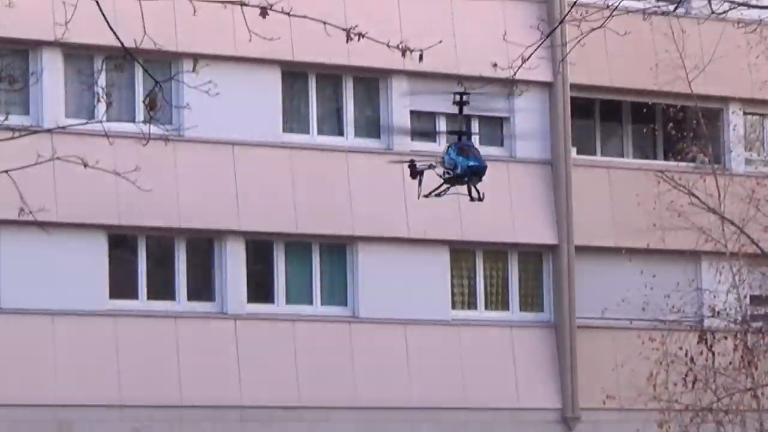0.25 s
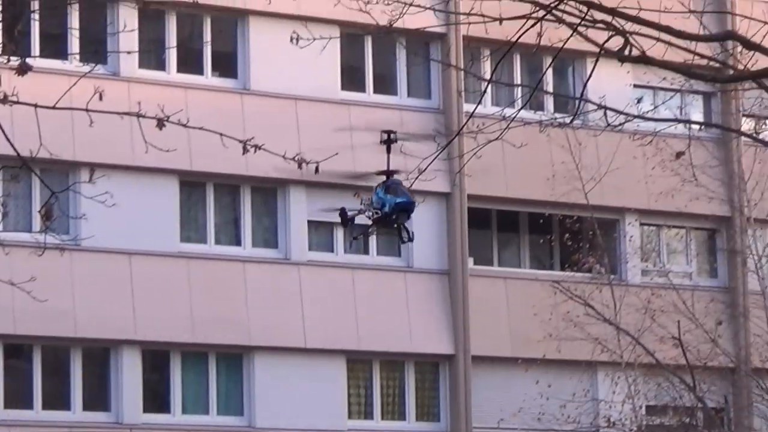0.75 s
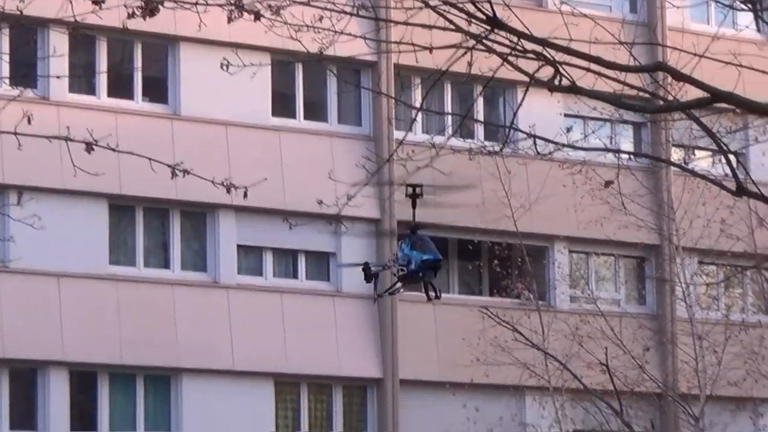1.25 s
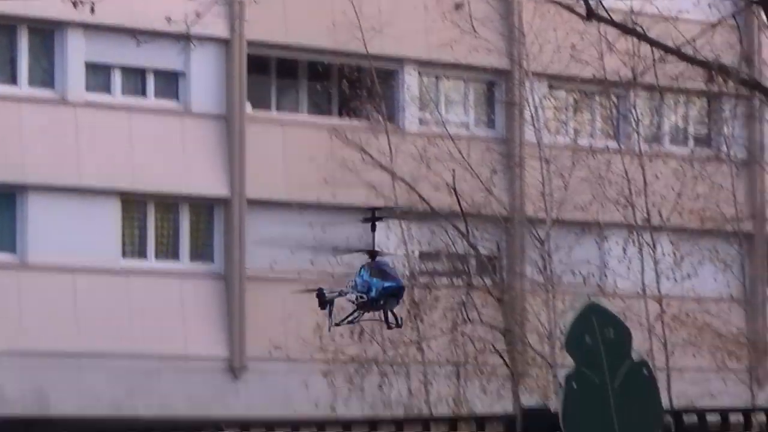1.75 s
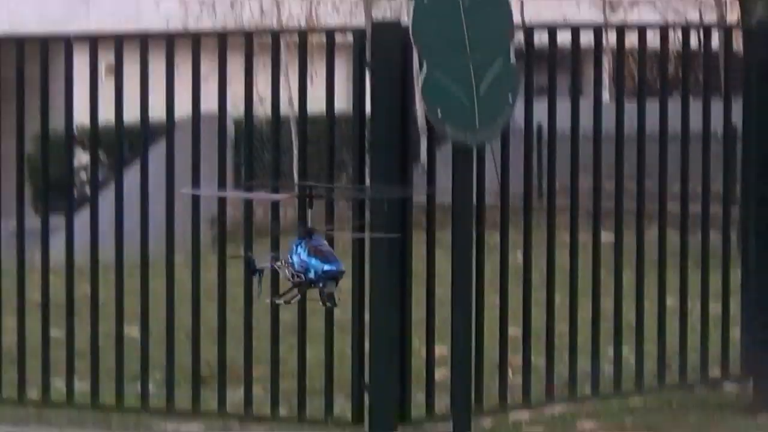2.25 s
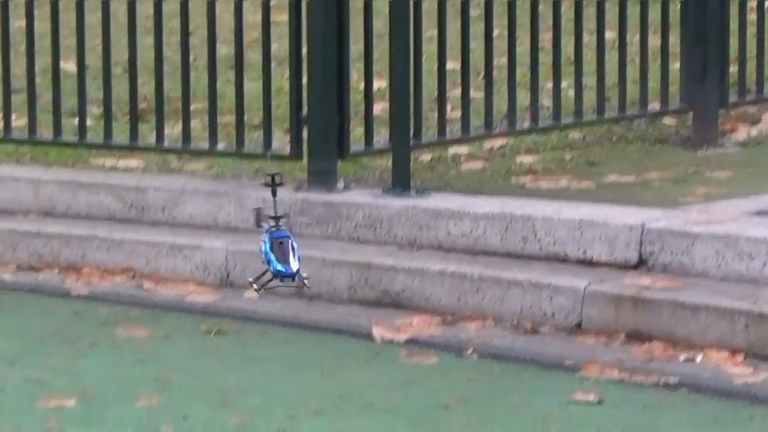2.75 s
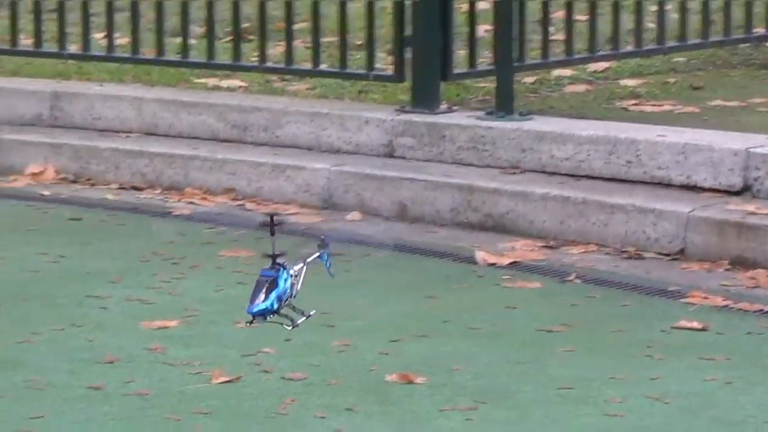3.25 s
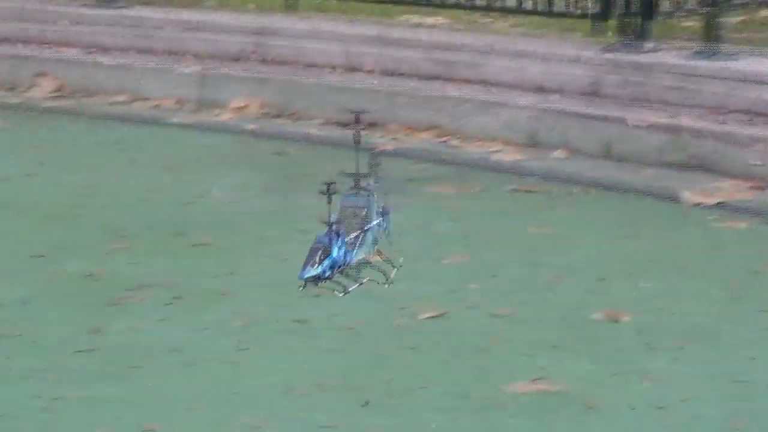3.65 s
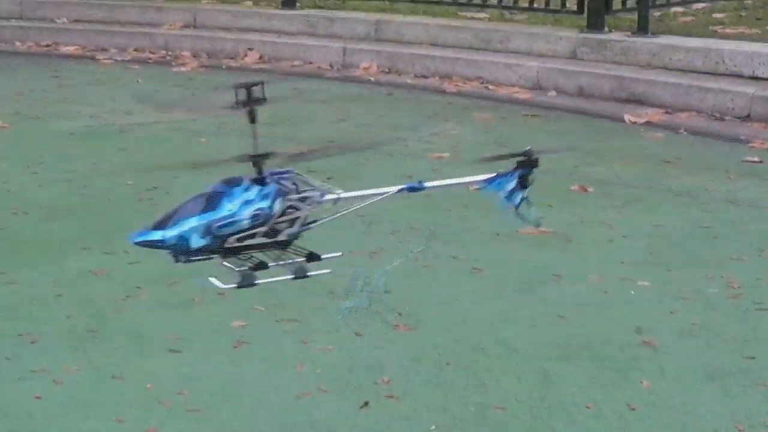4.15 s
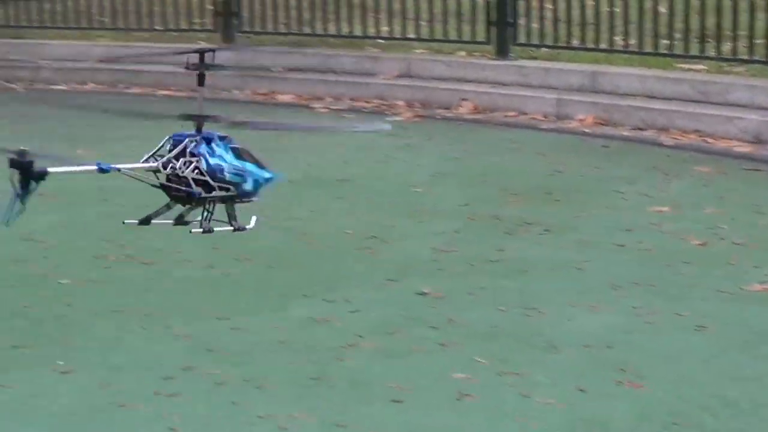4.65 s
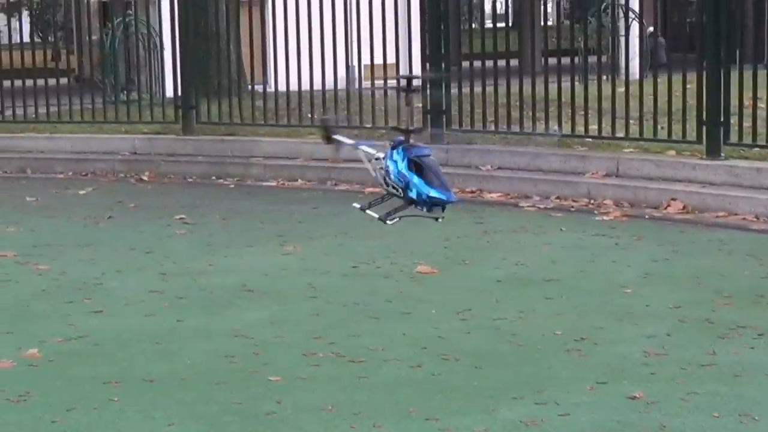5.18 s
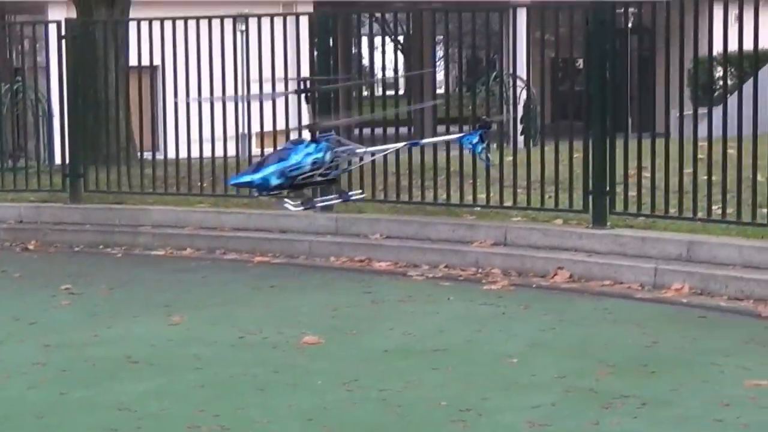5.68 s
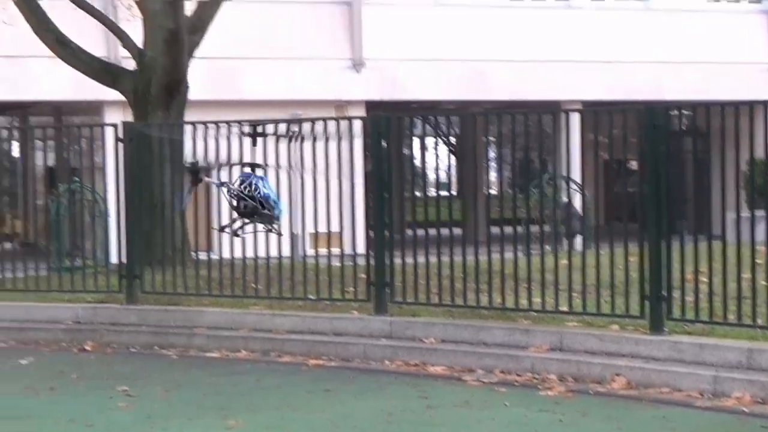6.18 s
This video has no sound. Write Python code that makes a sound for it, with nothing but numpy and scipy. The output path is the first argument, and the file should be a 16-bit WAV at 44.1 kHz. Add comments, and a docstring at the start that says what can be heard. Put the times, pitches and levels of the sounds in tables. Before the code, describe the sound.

A small electric helicopter flies outdoors several metres away, its plastic gears whining and rattling with a fast throb. The pitch sags, then climbs as it comes nearer. The whole sound sinks away, then cuts abruptly to the craft close by, brighter and louder, its whine and rattle sweeping past as it spins. Soft dull echoes, distant traffic and a faint machine hum lie behind, in wide stereo with slightly muffled top treble.

```python
"""Toy helicopter over a playground

A small electric helicopter flies between a fence and a block of flats. Its gear teeth scrape and knock,
so its parts rattle as ringing noise; the tooth rate whines as sines, and all throb with each rotor turn.
The whole sound sinks away, then the craft is suddenly close, spinning on the spot and sweeping its
rattle and whine past the listener like a beam. Dull echoes follow it.
Behind it a town murmurs in shaped noise, a distant machine hums in wavering sines and a faint tone passes."""
import sys
import numpy as np
from scipy import signal
from scipy.fft import rfft, irfft, next_fast_len
from scipy.io import wavfile

SR = 44100
rng = np.random.default_rng(int(sys.argv[2]) if len(sys.argv) > 2 else 0)


def file_out(sig):
    """Save sig as 16-bit WAV at sys.argv[1]."""
    # one column per channel
    cols = np.atleast_2d(sig).T
    # limit, then scale
    lim = np.clip(cols, -1, 1)
    pcm = np.round(lim * 32767).astype(np.int16)
    wavfile.write(sys.argv[1], SR, pcm)


N = 283122   # length in samples
TIME = np.arange(N) / SR   # seconds
CLOSE_S = 4.249   # the craft is suddenly close from this second
FADE_FROM_S, FADE_END_DB = 3.285, -14   # the sinking starts here; the town ends this low
CRAFT_SINKS = 1.1   # the craft sinks this many times as far as the town, in dB
CUTOFF_HZ = 10450   # nearly nothing is heard above this

# Colour of the far traffic. Each row: frequency in Hz, relative level in dB per Hz.
RUMBLE_COLOUR = [(20, -55), (30, -25), (40, -13), (62, -25.5), (110, -3), (170, -1), (270, 2.5), (340, -3),
                 (500, -15.5)]
# Colour of the town's murmur. Each row: frequency in Hz, relative level in dB per Hz.
MURMUR_COLOUR = [(200, -25), (310, -9), (400, -2.5), (720, -1.5), (880, -4), (1200, -5.5), (1700, -7.5),
                 (3000, -19), (9000, -24)]
# Swell of the town's murmur. Each row: time in seconds, level in dB.
MURMUR_SWELL = [(0.0, -38), (0.9, -39.5), (1.2, -36.5), (1.7, -38.5), (2.3, -39.5), (2.8, -38),
                (3.5, -40.2), (3.9, -36.5), (4.04, -29.5), (4.3, -39), (5.3, -39.5), (6.1, -38.5),
                (6.42, -40)]
# A deep rumble that comes and goes. Each row: time in seconds, level in dB.
DEEP_SWELL = [(0.0, -48.5), (0.3, -62), (1.0, -52), (1.5, -61.5), (3.4, -64.0), (4.4, -63.0), (6.42, -63)]
# Colour of the deep rumble. Each row: frequency in Hz, relative level in dB per Hz.
DEEP_RUMBLE_COLOUR = [(20, -35), (30, -16), (42, -5), (75, 12), (120, -21), (300, -49)]
# How alike left and right are. Each row: frequency in Hz, likeness (1 = the same on both sides).
STEREO_LIKENESS = [(40, 0.99), (130, 0.81), (300, 0.79), (650, 0.67), (1500, 0.36), (9000, 0.45)]
# Tones of the distant machine. Each row: frequency in Hz, level in dB over HUM_DB.
HUM_TONES = [(81.4, -30.5), (108.6, -17.5), (123, -18), (163, -11), (190.3, -17), (217.3, -11),
             (243.6, -10.5), (271.6, -9.5)]
# Its clearest tones, a low pair and a high pair. Each entry: frequency in Hz, dB over the pair's swell.
DRONE_PAIRS = [
    [(368, -2.5), (490, -5.5)],
    [(746, -2), (719.4, -6.5)],
]
# Swell of the low pair. Each row: time in seconds, level in dB.
DRONE_LOW_SWELL = [(0, -62), (1.3, -48), (2, -55), (3.2, -47), (4.5, -59), (6.42, -58.5)]
# Swell of the high pair. Each row: time in seconds, level in dB.
DRONE_HIGH_SWELL = [(0, -48), (2.4, -43.5), (3.1, -60), (4.3, -49.5), (6.42, -49)]
# A faint far tone that comes and fades. Each row: time in seconds, frequency in Hz, level in dB.
PASSING_TONE = [(5.85, 780, -70.5), (5.97, 795, -47), (6.06, 812, -47.5), (6.15, 830, -40.5),
                (6.2, 832, -57), (6.28, 826, -45), (6.38, 815, -69.5)]
RUMBLE_DB, HUM_DB = -41.5, -43.5

# Gear speed under the throttle, far off. Each row: time in seconds, tooth contacts per second.
GEAR_SPEED_FAR = [(0.0, 1950.0), (0.3, 1914.0), (0.6, 1868.0), (1.35, 1763.0), (1.78, 1767.0),
                  (2.14, 1901.0), (2.5, 1963.0), (2.73, 2033.0), (3.03, 2013.0), (3.24, 1918.0),
                  (3.45, 1929.0), (4.24, 1930.0)]
# Gear speed close by. Each row: time in seconds, tooth contacts per second.
GEAR_SPEED_NEAR = [(4.25, 2026.0), (4.45, 2010.0), (5.1, 1986.0), (5.7, 1983.0), (6.12, 2037.0),
                   (6.42, 2037.0)]
# Distance of the craft, far off. Each row: time in seconds, distance in metres.
METRES_FAR = [(0.0, 7.9), (1.3, 7.56), (2.3, 6.34), (3.2, 5.17)]
# Distance of the craft, close by. Each row: time in seconds, distance in metres.
METRES_NEAR = [(4.25, 2.24), (4.45, 1.95), (5.05, 2.62), (5.45, 3), (5.9, 2.65), (6.42, 3.36)]
# Far off the nose swings slowly past the listener.
# Each row: time in seconds, heading in degrees (0 = nose on, 90 = left side on).
NOSE_SWING = [(0.0, -33.5), (0.45, -31.5), (0.85, -27), (1.7, -34), (2.25, -32.5), (2.7, -24), (3.0, 0.5),
              (3.25, 21.0), (3.6, 8.0), (4.24, 24.5)]
# Delay of the ground bounce, changing with height. Each row: time in seconds, delay in seconds.
BOUNCE_DELAY = [(0, .0042), (1.2, .0045), (2.5, .004), (3.3, .0042), (4.6, .004), (5.5, .0043),
                (6.42, .0045)]
REFERENCE_M = 1.753   # distance adds 0 dB here
SPIN_DEG_PER_S, NOSE_ON_S = 226, 5.47   # steady spin close by, and when the nose points at the listener
TEETH, PINION_TEETH = 75, 8   # main wheel and small driving gear

# Load swing of the off-centre main wheel. Each row: times per rotor turn, depth in dB.
LOAD_THROB = [(1, 1.45), (2, -0.3), (3, 0.3), (4, 1.1), (5, 1.1), (6, 0.8), (7, 1.2)]
# Ringing of the canopy. Each row: frequency in Hz, width in Hz, relative level in dB.
CANOPY_MODES = [(1605, 800, -3.5), (1883, 400, -9), (2385, 370, -2), (2698, 160, -4.5), (3150, 4700, -8.5),
                (3750, 1400, -4.5), (4385, 1540, -8.5)]
# Ringing of the frame. Each row: frequency in Hz, width in Hz, relative level in dB.
FRAME_MODES = [(4782, 410, 1), (5084, 680, -1.5)]
# Ringing of the gear wheel. Each row: frequency in Hz, width in Hz, relative level in dB.
WHEEL_MODES = [(5770, 1300, 1), (6646, 980, 6), (7134, 690, 1.5)]
# Ringing of the tooth sizzle. Each row: frequency in Hz, width in Hz, relative level in dB.
SIZZLE_MODES = [(8260, 920, -1.6), (9260, 1450, -1.8), (10730, 1700, 2.4)]
# Rattle thrown from nose, left side, tail and right side, one row each, before distance counts.
# Each row: canopy level in dB, frame level in dB, gear wheel level in dB, tooth sizzle level in dB.
RATTLE_FACES = [(-31, -37, -30.5, -26.5), (-30, -24, -24.5, -24.5), (-32, -33, -28, -21.5),
                (-27.5, -23.5, -31.5, -24.5)]
# Bright bands that slide up as the body turns side on.
# Each row: end-on frequency in Hz, side-on frequency in Hz, half width in Hz, dB over the frame's level.
BODY_RIDGES = [(4266, 5200, 340, -5.5), (5805, 6650, 220, -9.5)]
# Weaker motor tones around the whine. Each row: multiple of the tooth rate, relative level in dB.
MOTOR_TONE_ROWS = [(.75, -8), (.875, -12), (1.0947, -10), (1.1893, -11)]
# Gearbox ringing, one row beside each whine harmonic and following its level.
# Each row: frequency in Hz, width in Hz, relative level in dB.
GEARBOX_MODES = [(1930, 320, -6), (4110, 400, -3), (6005, 1100, 2.5), (7440, 1100, -2.5)]
# The whine leaves the body in lobes; levels are before throttle and distance count.
# Each row: heading in degrees, then first, second, third and fourth harmonic level in dB.
WHINE_LOBES = [(-180.0, -43.5, -41.5, -43, -61), (-150.0, -35.0, -29, -42, -32),
               (-120.0, -34, -34, -30.0, -29.5), (-89.5, -31.5, -32.0, -30, -56),
               (-60.0, -28.5, -41.5, -35.0, -48), (-34.5, -34.5, -31, -34.5, -34),
               (0.0, -45.5, -35, -33.5, -38), (27.5, -31, -35, -41, -38), (66, -29, -33, -54, -64),
               (100, -32.5, -46, -30, -63), (119, -30.0, -32, -34, -31), (149, -35, -32.5, -37, -46)]
# Far off, the two lowest whine tones swell and fade.
# Each row: time in seconds, change of the first harmonic in dB, change of the second in dB.
WHINE_FAR_SWELL = [(0, -0.5, -0.5), (.45, 1.5, 4), (.85, -7, -7.5), (1.27, 7, -5), (1.55, -7.5, -10),
                   (1.95, 3.5, -5), (2.15, 0.5, 1), (2.42, 5, -0.5), (2.6, -2, 2.5), (2.98, 2, -5.5),
                   (3.25, 1.5, -1), (3.55, -7, -6), (3.88, 6, -7), (4.24, 0, -5)]
HOVER_MESH_HZ, WHINE_DB_PER_OCTAVE = 2000, 28   # the whine grows with gear speed
CLEAN_WHINE_DB = 0.9   # lifts the clean tones out of the gearbox noise


def from_db(db):
    """Turn decibels into gain."""
    return 10 ** (np.asarray(db) / 20)


def rms_one(x):
    """Scale to an average strength (rms) of 1."""
    return x / np.sqrt(np.mean(x ** 2) + 1e-20)


def in_time(rows):
    """Draw one curve over time per column, with straight lines between the rows."""
    seconds, *columns = np.transpose(rows)
    return np.array([np.interp(TIME, seconds, column) for column in columns])


def at_hz(points, hz):
    """Read a table of frequencies, with even steps per octave."""
    table_hz, value = np.transpose(points)
    return np.interp(np.log(hz + 1e-3), np.log(table_hz), value)


def drift(rate):
    """Random wandering of rms 1: noise smoothed at about `rate` Hz, made at a tenth of the sample rate."""
    r = np.exp(-20 * np.pi * rate / SR)
    noise = rng.standard_normal(N // 10 + 8002)
    slow = signal.lfilter([1], [1, -2 * r, r * r], noise)[8000:]   # skip the filter's start
    return np.interp(np.arange(N) / 10, np.arange(len(slow)), rms_one(slow))


def sine(cycles):
    """A sine with a random starting point; it has rms 1 and follows a running count of cycles."""
    return np.sqrt(2) * np.sin(2 * np.pi * (cycles + rng.random()))


def resonate(x, hz, width):
    """Ring at one frequency: two equal resonances in a row, with gain 1 on top."""
    r = np.exp(-np.pi * width / SR)
    gain = (1 - r * r) / 2
    section = [gain, 0, -gain, 1, -2 * r * np.cos(2 * np.pi * hz / SR), r * r]
    return signal.sosfilt([section, section], x)


def fade():
    """Gain of the sinking: it falls along a straight line, then is back at once."""
    sinking = np.interp(TIME, [FADE_FROM_S, CLOSE_S], [1, from_db(FADE_END_DB)])
    return np.where(TIME < CLOSE_S, sinking, 1)


def wide_noise(spectrum):
    """Stereo noise of rms 1 from all around: shared noise plus noise of opposite sign on each side."""
    size = next_fast_len(N)
    hz = np.fft.rfftfreq(size, 1 / SR)
    mid, side = rfft(rng.standard_normal((2, size))) * from_db(at_hz(spectrum, hz))
    alike = np.clip(at_hz(STEREO_LIKENESS, hz), -1, 1)
    both = np.sqrt(1 + alike) * mid + np.sqrt(1 - alike) * side * [[1], [-1]]
    return rms_one(irfft(both, size)[:, :N])


def traffic(swell_db):
    """Far traffic and murmur: broad noise that swells, with a deep rumble that comes and goes."""
    murmur_db = in_time(MURMUR_SWELL)[0]
    rumble = from_db(RUMBLE_DB + swell_db) * wide_noise(RUMBLE_COLOUR)
    murmur = from_db(murmur_db) * wide_noise(MURMUR_COLOUR)
    deep = from_db(in_time(DEEP_SWELL)[0]) * wide_noise(DEEP_RUMBLE_COLOUR)
    return rumble + murmur + deep


def distant_machine(swell_db):
    """A humming machine: steady tones whose pitch and level waver a little."""
    lines = [(hz, HUM_DB + swell_db + db + 2.0 * drift(2.1)) for hz, db in HUM_TONES]
    for curve, pair in zip((DRONE_LOW_SWELL, DRONE_HIGH_SWELL), DRONE_PAIRS):
        lines += [(hz, in_time(curve)[0] + db) for hz, db in pair]
    hum = 0
    for hz, db in lines:
        cycles = np.cumsum(hz * (1 + 0.0013 * drift(2.2))) / SR
        hum = hum + from_db(db + 1.8 * drift(20)) * sine(cycles)
    return hum


def passing_tone():
    """A faint far tone: one sine with a quickly trembling pitch and level."""
    tone_hz, tone_db = in_time(PASSING_TONE)
    cycles = np.cumsum(tone_hz * (1 + 0.012 * drift(30))) / SR
    return from_db(tone_db + 2 * drift(25)) * sine(cycles)


def town():
    """The background: traffic and hum share one slow swell, and one tone passes."""
    swell_db = 0.5 * drift(0.67)
    return traffic(swell_db) + distant_machine(swell_db) + passing_tone()


def courtyard(x, echo_db, t60, dull_hz):
    """Fence, steps and house front scatter dull echoes, different on each side; t60 is their fall in seconds."""
    t = TIME[:SR // 2]
    scatter = rng.standard_normal((2, len(t))) * from_db(-60 * t / t60) * (t > 0.008)
    scatter = scatter / np.sqrt(np.sum(scatter ** 2) / 2)
    dulling = signal.butter(1, min(dull_hz, SR / 3), fs=SR, output="sos")
    scatter = signal.sosfilt(dulling, scatter)
    return x + from_db(echo_db) * signal.fftconvolve(x[None], scatter, axes=1)[:, :N]


def ground(x, bounce_db):
    """A weak, late copy off the ground boosts and thins the sound in bands that slide with height."""
    late = np.interp(TIME - in_time(BOUNCE_DELAY)[0], TIME, x, left=0)
    return x + from_db(bounce_db) * late


def flight():
    """Gear speed (Hz), heading (degrees) and loudness by distance (dB), far off and then close by."""
    close = TIME >= CLOSE_S
    mesh_hz = np.where(close, in_time(GEAR_SPEED_NEAR), in_time(GEAR_SPEED_FAR))[0]
    heading = np.where(close, SPIN_DEG_PER_S * (TIME - NOSE_ON_S), in_time(NOSE_SWING)[0])
    metres = np.where(close, in_time(METRES_NEAR), in_time(METRES_FAR))[0]
    return mesh_hz, heading, 20 * np.log10(REFERENCE_M / metres)


def rattle_towards(heading):
    """Level of each part (dB): the faces of the craft share its rattle as they turn to the listener."""
    ahead, aside = np.cos(np.radians(heading)), np.sin(np.radians(heading))
    shares = np.maximum([ahead, aside, -ahead, -aside], 0) ** 2
    return 10 * np.log10(from_db(RATTLE_FACES).T ** 2 @ shares)   # powers add up


def whine_towards(heading, mesh_hz):
    """Level of each harmonic (dB): its lobes sweep past the listener, and it grows with the throttle."""
    angles, *lobes = np.transpose(WHINE_LOBES)
    beam_db = np.array([np.interp(heading, angles, lobe, period=360) for lobe in lobes])
    return beam_db + WHINE_DB_PER_OCTAVE * np.log2(mesh_hz / HOVER_MESH_HZ)


def tooth_scrape(teeth, worn_share):
    """Friction between teeth: part is chance, part is the wheel's surface coming round on every turn."""
    surface = signal.resample(rng.standard_normal(TEETH * 16), TEETH * 128)   # 128 points per tooth
    position = (teeth * 128).astype(int) % len(surface)
    again = rms_one(surface[position])
    share = np.clip(worn_share, 0, 1)
    return np.sqrt(share) * again + np.sqrt(1 - share) * rng.standard_normal(N)


def tooth_force(teeth, bite_db, flutter_db, chatter_db):
    """Contact force peaks at each tooth, swings with the rotor and flutters in the play between teeth."""
    turns = teeth / TEETH
    throb = sum(depth * np.sin(2 * np.pi * (round(times) * turns + rng.random()))
                for times, depth in LOAD_THROB)
    load_db = throb + bite_db * np.cos(2 * np.pi * teeth)
    load_db += flutter_db * drift(170) + chatter_db * drift(1300)
    return rms_one(from_db(np.minimum(load_db, 4.5)))   # the plastic yields to the hardest blows


def part(modes, teeth, force):
    """One part of the craft rings under the scraping teeth; rms 1."""
    ringing = 0
    for hz, width, db in modes:
        scrape = force * tooth_scrape(teeth, worn_share=0.2)
        ringing = ringing + from_db(db) * resonate(scrape, hz, width)
    return rms_one(ringing)


def ridges(heading, force):
    """The body colours the rattle with bands of noise that rise and fall twice in each turn."""
    side_on = np.sin(np.radians(heading)) ** 2
    out = 0
    for end_hz, side_hz, width, db in BODY_RIDGES:
        angle = 2 * np.pi * np.cumsum(end_hz + (side_hz - end_hz) * side_on) / SR
        band = drift(width) * np.cos(angle) + drift(width) * np.sin(angle)
        out = out + from_db(db) * rms_one(force ** 0.7 * band)
    return out


def body_rattle(teeth, force, heading, levels_db):
    """Canopy, frame, wheel and teeth ring together; each follows the tooth force to its own degree."""
    canopy_db, frame_db, wheel_db, sizzle_db = levels_db
    rattle = from_db(canopy_db) * part(CANOPY_MODES, teeth, force)
    frame = 0.84 * part(FRAME_MODES, teeth, force ** 0.63)
    rattle += from_db(frame_db) * (frame + ridges(heading, force))
    rattle += from_db(wheel_db) * part(WHEEL_MODES, teeth, force ** 0.28)
    rattle += from_db(sizzle_db) * part(SIZZLE_MODES, teeth, force ** 1.35)   # harder contacts are brighter
    return rattle


def motor(teeth, canopy_db):
    """Weaker motor tones tied to the tooth rate and to the canopy's level, stronger close by."""
    tones = sum(from_db(canopy_db + db + 0.99 * drift(2.0)) * sine(multiple * teeth)
                for multiple, db in MOTOR_TONE_ROWS)
    return from_db(np.where(TIME >= CLOSE_S, -5.5, -8)) * tones


def gearbox(teeth, force, whine_db):
    """The gearbox rings beside each harmonic and swells with it."""
    return sum(from_db(level_db + db) * part([(hz, width, 0)], teeth, force)
               for level_db, (hz, width, db) in zip(whine_db, GEARBOX_MODES))


def whine(teeth, force, whine_db, wobble, jitter):
    """Clean tooth harmonics; the uneven pinion and the play between teeth roughen the high ones most."""
    turn = teeth / PINION_TEETH
    contact = teeth + wobble * (sine(turn) + 0.13 * sine(2 * turn)) + jitter * drift(170)
    tones = sum(from_db(db + 0.35 * (k + 1.5) * drift(20)) * sine((k + 1) * contact)
                for k, db in enumerate(whine_db))
    return from_db(CLEAN_WHINE_DB) * np.sqrt(force) * tones


def helicopter():
    """Rough and clean sound, both locked to the gear speed, as loud as heading and distance make them."""
    mesh_hz, heading, distance_db = flight()
    teeth = np.cumsum(mesh_hz * (1 + 0.0005 * drift(18.7))) / SR   # running count of tooth contacts
    rattle_db = rattle_towards(heading) + distance_db
    whine_db = whine_towards(heading, mesh_hz) + distance_db
    whine_db[:2] += np.where(TIME < CLOSE_S, in_time(WHINE_FAR_SWELL), 0)
    force = tooth_force(teeth, bite_db=1.5, flutter_db=0.74, chatter_db=2.8)
    rattle = body_rattle(teeth, force, heading, rattle_db)
    rough = ground(rattle, bounce_db=-14.5) + gearbox(teeth, force, whine_db) + motor(teeth, rattle_db[0])
    return rough, whine(teeth, force, whine_db, wobble=0.012, jitter=0.016)


def scene():
    """The craft in front, its whine with weaker echoes than its rattle; craft and town lean slightly right."""
    rough, clean = helicopter()
    craft = courtyard(rough, echo_db=-7.0, t60=0.24, dull_hz=4500)
    craft += courtyard(clean, echo_db=-15, t60=0.35, dull_hz=4500)
    lean_db = np.where(TIME < CLOSE_S, 0.45, 0.2)
    craft = fade() ** CRAFT_SINKS * craft * from_db(lean_db * [[-1], [1]])
    return craft + fade() * town() * from_db([[-0.6], [0.6]])


def record(dry):
    """A very steep filter cuts off the top of the treble."""
    return signal.sosfilt(signal.ellip(14, 0.1, 85, CUTOFF_HZ, fs=SR, output="sos"), dry)


dry = scene()
out = record(dry)
file_out(out)
```